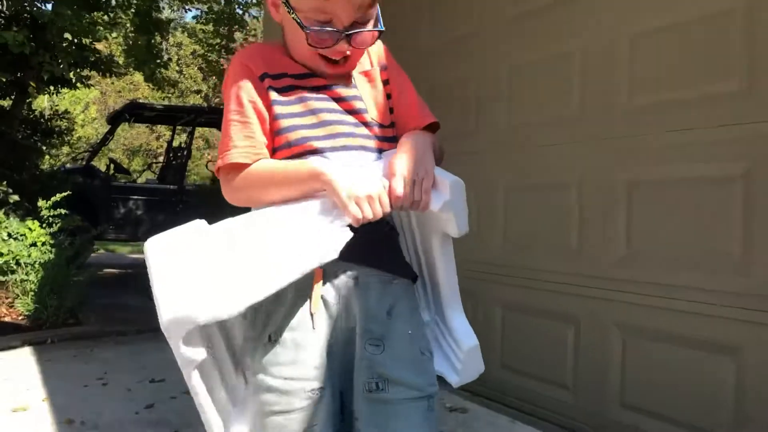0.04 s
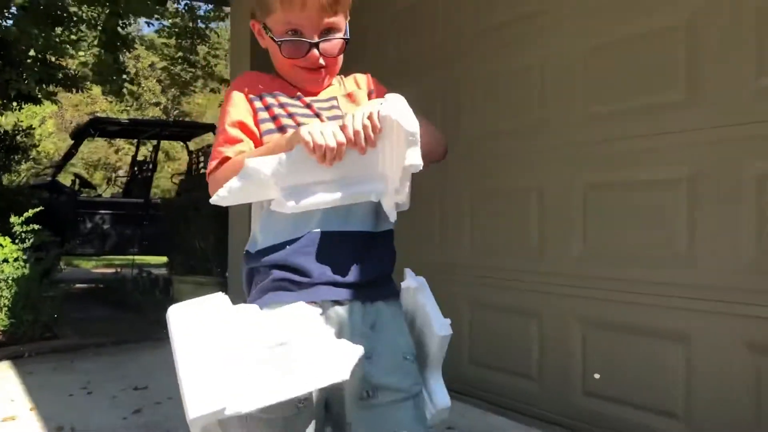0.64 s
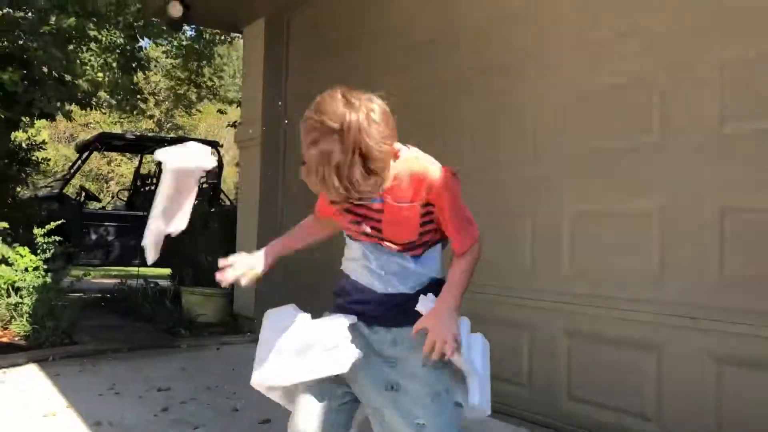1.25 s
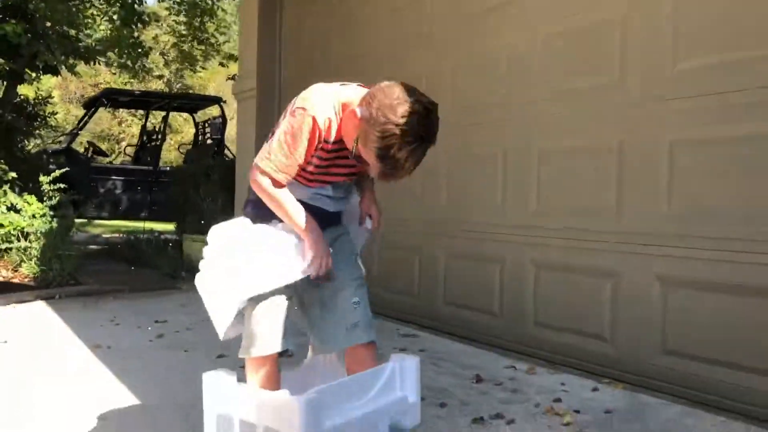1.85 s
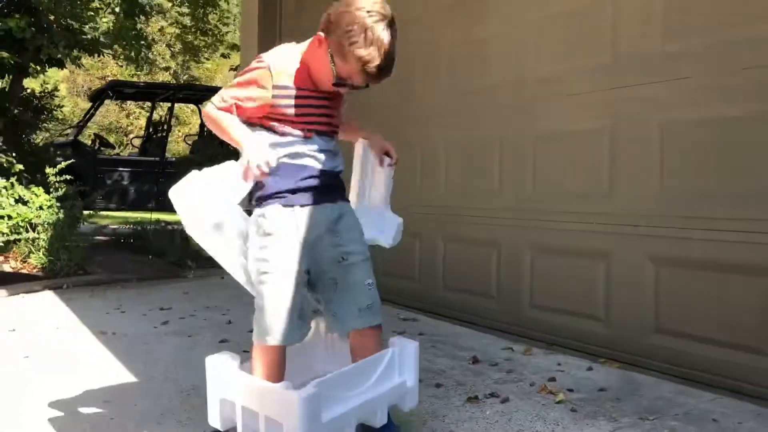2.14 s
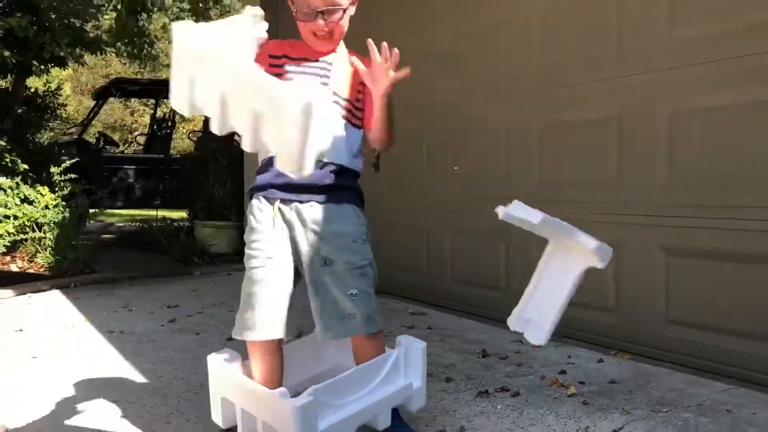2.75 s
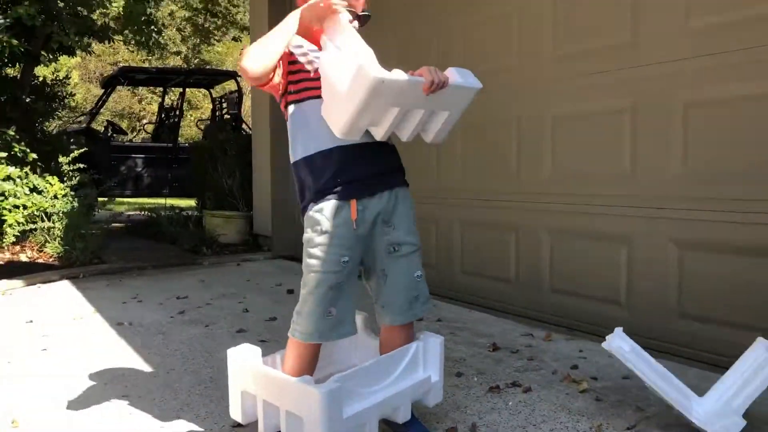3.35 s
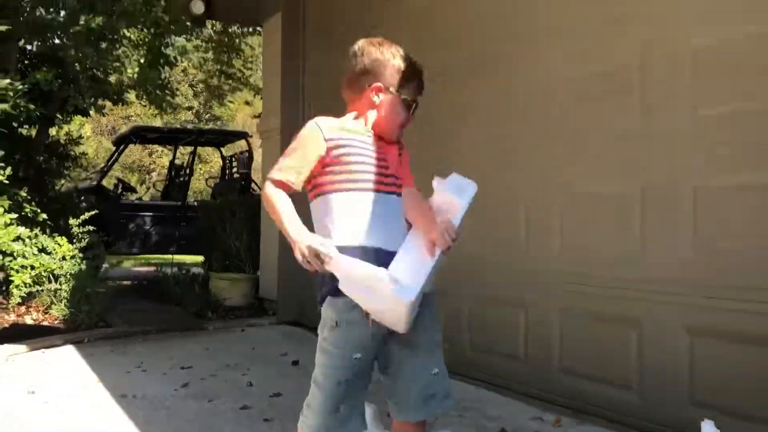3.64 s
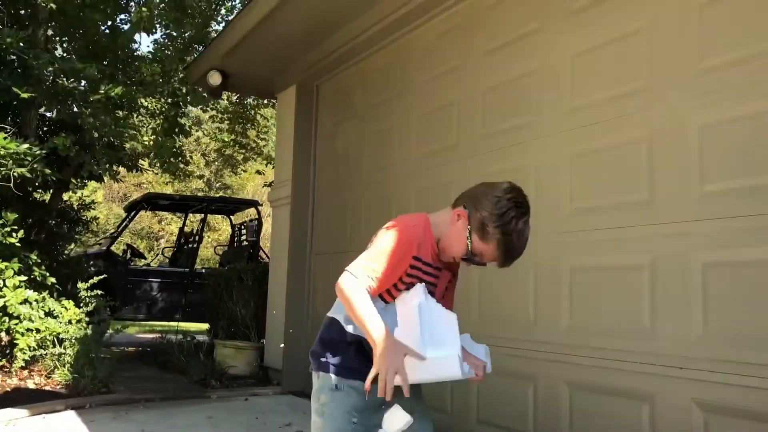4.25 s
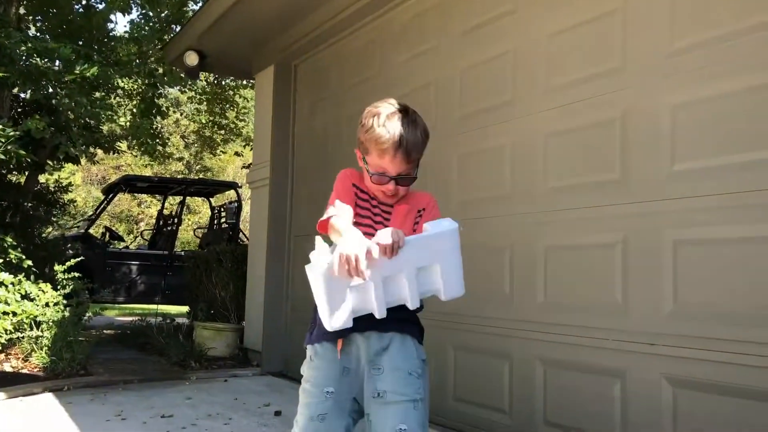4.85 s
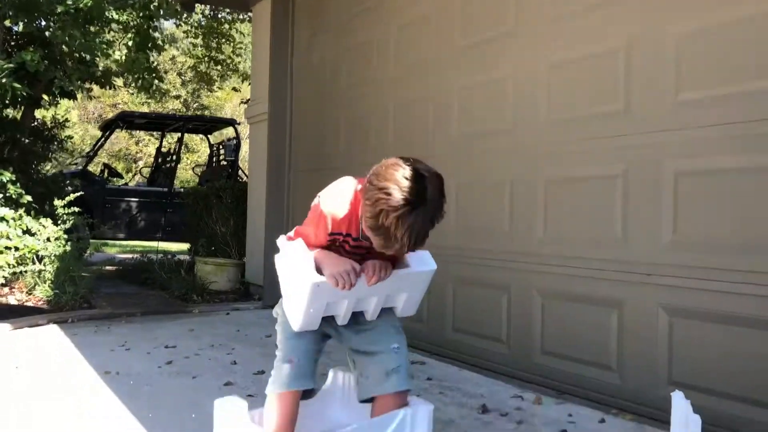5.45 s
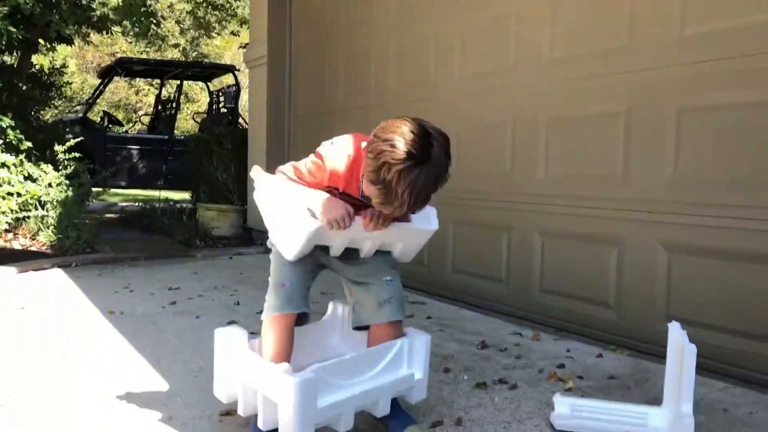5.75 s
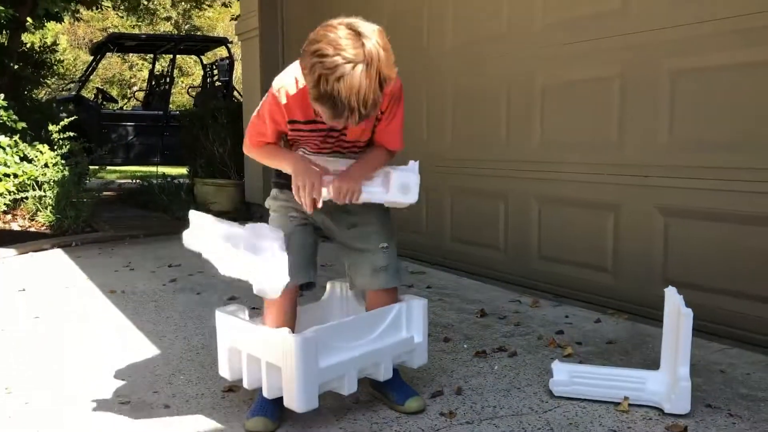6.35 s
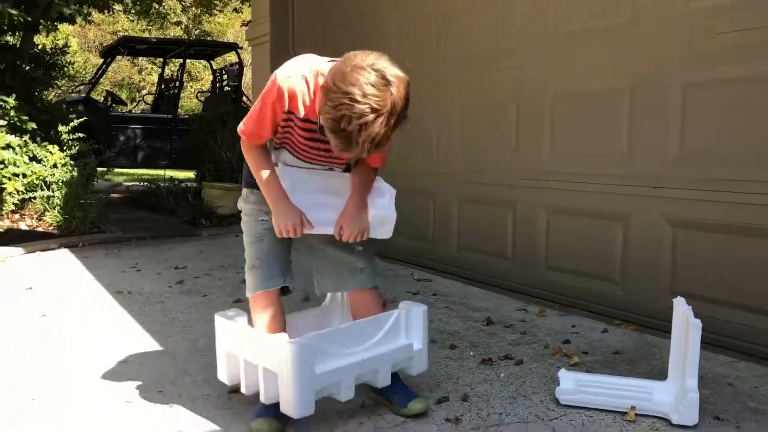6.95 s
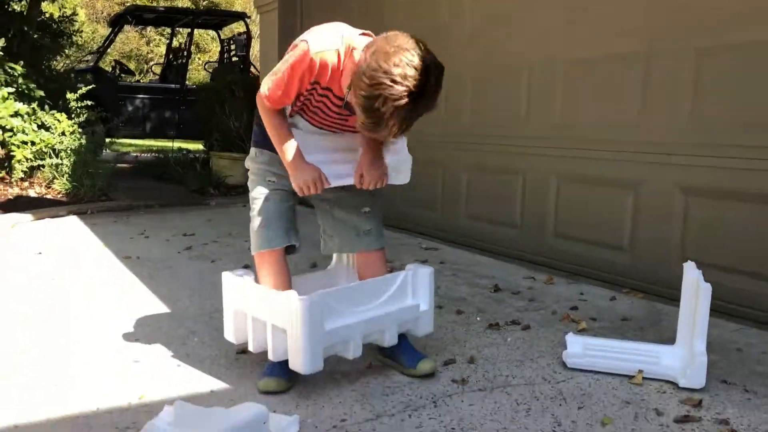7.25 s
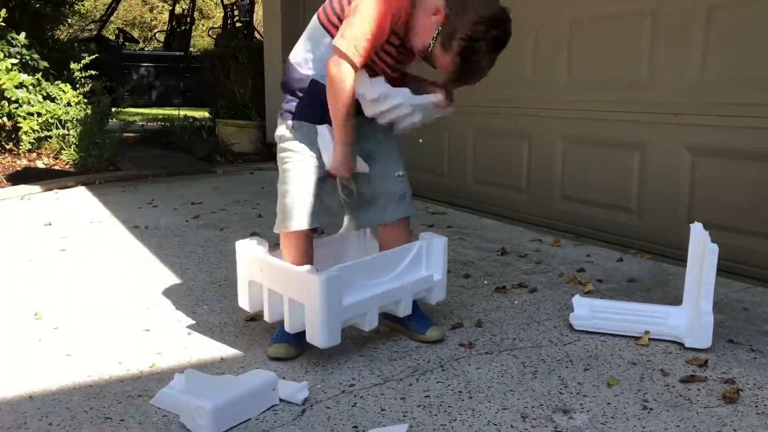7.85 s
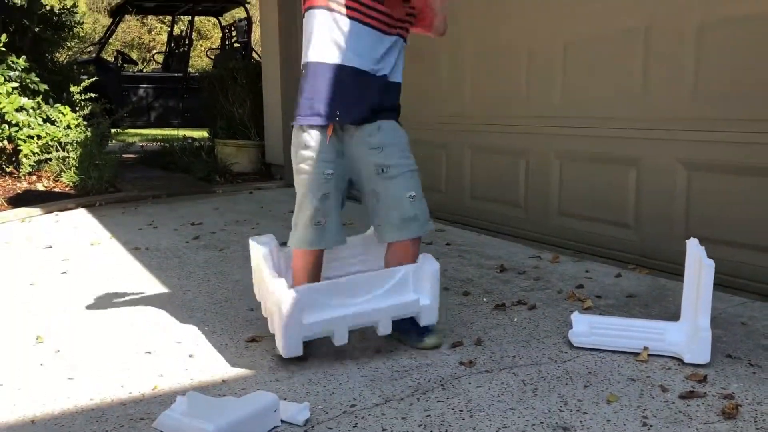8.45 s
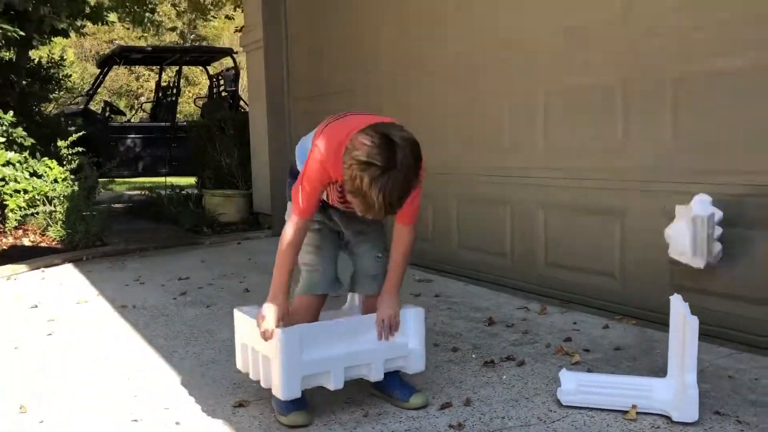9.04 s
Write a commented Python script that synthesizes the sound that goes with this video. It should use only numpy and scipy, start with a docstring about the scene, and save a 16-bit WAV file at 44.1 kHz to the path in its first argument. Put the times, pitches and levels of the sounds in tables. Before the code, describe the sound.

Outdoors by a garage door, nearby foam blocks snap five times, each break a short crackling burst with a hollow pop and a brief slap off the walls. In the gaps, handled pieces rustle softly, scuff and bump. One louder ringing knock comes shortly before the last snap, and a cluster of light, hollow thuds follows it. A low rumble and far machine drone continue underneath.

```python
"""A driveway, in front of a garage door: a child snaps styrofoam packing blocks by hand.
Each break is a run of bright cracks as the beads tear, and a hollow pop as the freed slab flexes.
Between breaks, pieces knock, drop and ring, and rub with a fine hiss, small ticks and squeaks.
The door and a far wall throw the cracks back, over a bed of outdoor air and far machine hum."""
import sys
import numpy as np
from scipy import signal
from scipy.fft import rfft, irfft
from scipy.io import wavfile
from scipy.ndimage import uniform_filter1d

SR = 44100
rng = np.random.default_rng(int(sys.argv[2]) if len(sys.argv) > 2 else 0)


def transcribe(u):
    """Save the signal u as a 16-bit wav file named by the first command-line argument.

    u: samples, shape (n,) or (channels, n), limited to [-1, 1]; the rate is SR.
    q: integer samples, one column per channel.
    """
    v = np.clip(np.atleast_2d(u).T, -1, 1)
    q = np.round(v * 32767).astype(np.int16)
    wavfile.write(sys.argv[1], SR, q)


N = 406161
TIME = np.arange(N) / SR
HIT_TIME = TIME[:8192]  # time axis of one short hit


# The hero snaps, one row a crack: start_s, crackle_db, tilt_db_per_octave, pop_db, pitch_hz
CRACK_CUES = [(.014, -7.5, 3, -20.5, 1440), (.0698, -9, 0.7, -18, 1230), (.0819, -24, -4, -18.5, 1070),
              (.0975, -35, 13, -13.5, 680), (.1054, -6, 1.5, -22, 1170), (.1225, -18, -4.5, -12.5, 404),
              (.1305, -6, 3.5, -13.5, 820), (.149, -16, 0, -15.5, 740), (.156, -17, 6, -18, 950),
              (1.9606, -25.5, -0.5, -20, 910), (1.9731, -15, -2, -29, 1370), (1.9845, -14, -0.5, -23, 1105),
              (2.1118, -22, -1, -37, 1110), (2.1342, -6.5, -1.5, -18, 1280), (2.138, -1, -1, -15.5, 940),
              (2.149, -18, 1, -17.5, 806), (2.162, -21, 1, -21, 950), (3.926, -5.5, 0.2, -20, 1480),
              (3.9302, -10, -1, -19, 1420), (3.9323, -37, -10, -9.5, 637), (5.7328, -7, -0.5, -13.5, 916),
              (5.7372, -9, 3, -36, 1120), (5.7582, -5.5, 0, -24, 1074), (5.769, -15, 1.5, -28, 1100),
              (7.6738, -17, -1.5, -26, 1000), (7.6805, -2.5, 0, -22, 1980), (7.6942, -10.5, 1, -17.5, 2000),
              (7.7076, -13, 5, -19.5, 1170)]

def cracks(tear_s=0.00097, tear_doubling_db=11, pop_lag_s=0.001237):
    """The beads tear first; the slower bending waves of the freed slab follow as a pop."""
    out = np.zeros(N)
    for start_s, crackle_db, tilt_db, pop_db, hz in CRACK_CUES:
        tearing_s = tear_s * 2 ** (-crackle_db / tear_doubling_db)  # a hard crack tears faster
        add(out, start_s, gain_of(crackle_db - 3) * crackle(tearing_s, tilt_db))
        body = flex(hz, swell(HIT_TIME / 0.003), slope_db=6.5, octaves=0.76, lowest_hz=312)
        punch = bending_wave(0.889 * hz, peak_s=0.0015, glide=0.73)
        pop = gain_of(-2) * body + gain_of(1) * punch
        add(out, start_s + pop_lag_s, gain_of(pop_db) * pop)
    return highpass(out, 230, order=3)  # front and back of a thin slab cancel in the bass


# Tone colour of tearing beads: frequency_hz, level_db
BEAD_EQ = [(150, 5.5), (350, -2), (700, 5.5), (1500, 3), (3000, 2.5), (5000, 1.5), (9000, -2.5),
           (16000, -7)]

def crackle(peak_s, tilt_db=3, clump_db=2, clump_hz=900):
    """Beads of uneven size part in a quick avalanche, which splinters into clumps."""
    n = len(HIT_TIME)
    clumps = shaped_noise(n, lambda f: -20 * np.log10(1 + (f / clump_hz) ** 2))
    snaps = rng.standard_normal(n) * gain_of(rng.standard_normal(n) + clump_db * clumps)
    snaps = equalise(snaps, lambda f: curve_at(BEAD_EQ, f) + tilt_db * np.log2(f / 6000))
    return burst(snaps, swell(HIT_TIME / peak_s))


def flex(hz, envelope, slope_db, octaves, lowest_hz):
    """Hollow body: the crowded, heavily damped bending modes of foam, gathered round one pitch."""
    def hump_db(f):
        bass_loss_db = 10 * np.log10(1 + (lowest_hz / f) ** 8)  # a small piece radiates no bass
        return -slope_db * (np.hypot(np.log2(f / hz), octaves) - octaves) - bass_loss_db
    return burst(shaped_noise(len(HIT_TIME), hump_db), envelope)


def bending_wave(hz, peak_s, glide):
    """High bending waves run fastest, so a pop of a few cycles falls in pitch."""
    turns = np.cumsum(hz * (1 + glide * np.exp(-HIT_TIME / peak_s))) / SR
    return swell(HIT_TIME / peak_s) * np.sin(2 * np.pi * turns)


# Knocks of loose pieces: start_s, thud_db, pitch_hz, scuff_db
KNOCK_CUES = [(1.19, -35.5, 304, -41), (1.299, -28.5, 923, -46), (1.519, -26, 1480, -52),
              (1.595, -23, 688, -31), (1.6055, -27, 515, -35), (2.464, -43, 2010, -57),
              (2.568, -40, 1510, -55), (2.877, -30.5, 807, -35.5), (2.902, -31.5, 572, -34.5),
              (3.012, -27.5, 452, -35), (3.115, -36, 1296, -48), (3.69, -30, 1870, -20.5),
              (4.712, -34.5, 588, -56), (4.868, -31.5, 707, -38), (4.985, -28.5, 1071, -35),
              (6.534, -28, 481, -45), (6.644, -32, 878, -42), (6.899, -33, 1190, -49),
              (6.918, -30.5, 1230, -37), (6.934, -24.5, 1563, -31.5), (8.899, -25.5, 513, -31.5),
              (8.984, -31.5, 740, -30.5), (9.003, -23.5, 514, -33), (9.071, -22, 888, -24),
              (9.193, -29.5, 670, -31)]

def knocks(attack_s=0.0002, decay_s=0.01, ring_t60_s=0.38, cushion_hz=2800):
    """Soft pieces hit hands, legs and concrete: a cushioned thud, a brief ring, a scuff of beads."""
    out = np.zeros(N)
    thud_envelope = (1 - np.exp(-HIT_TIME / attack_s)) * np.exp(-HIT_TIME / decay_s)
    ring_envelope = (1 - np.exp(-HIT_TIME / decay_s)) * gain_of(-60 * HIT_TIME / ring_t60_s)
    for start_s, thud_db, hz, scuff_db in KNOCK_CUES:
        thud = flex(hz, thud_envelope, slope_db=6.5, octaves=0.4, lowest_hz=189)
        thud += gain_of(-2) * bending_wave(hz, peak_s=0.0024, glide=0.34)
        thud = equalise(thud, lambda f: -10 * np.log10(1 + (f / cushion_hz) ** 4))
        # each grip leaves other modes free to ring
        free_hz = hz * 2 ** (np.linspace(-1, .5, num=5) + rng.uniform(-0.151, 0.17, size=5))
        ring = unit_rms(np.sin(2 * np.pi * np.outer(HIT_TIME, free_hz)).sum(axis=1)) * ring_envelope
        add(out, start_s, gain_of(thud_db) * (thud + gain_of(-15) * ring))
        add(out, start_s, gain_of(scuff_db) * crackle(peak_s=0.003))
    return out


# Thumps and rings of the torn slab, the hand-held block and the foam frame on the ground (the slab's ring at
# 0.19 s rises as the first breaks come back off the far wall): start_s, ring_db, thump_db, thump_pitch_hz,
# thump_peak_s
SLAB_HITS = [(.148, -38, -16, 820, 0.0044), (.188, -29.5, -32, 705, 0.0044),
             (1.872, -43, -17.5, 493, 0.0012), (2.903, -46, -31.5, 468, 0.02),
             (3.936, -36, -14.5, 452, 0.0041)]
BLOCK_HITS = [(6.934, -12, -1.5, 814, 0.0011), (7.129, -33, -17, 677, 0.00047)]
FRAME_HITS = [(0.001, -38, -28, 178, 0.0053), (1.193, -56, -33, 267, 0.0044),
              (1.307, -53, -21.5, 328, 0.0017), (1.596, -44.5, -25.5, 247, 0.0046),
              (2.880, -44, -21, 97, 0.0045), (3.013, -43, -19.5, 206, 0.0049),
              (3.165, -44, -28, 206, 0.0035), (6.447, -42, -27.5, 220, 0.0041),
              (6.534, -35.5, -21, 214, 0.011), (8.900, -39, -18, 215, 0.0067),
              (9.074, -26.5, -13, 113, 0.0066), (9.194, -27, -12.5, 340, 0.001)]
# The notes each piece rings with: pitch_hz, level_db, t60_s
SLAB_MODES = [(524, 10, 0.3), (750, 3, 0.2), (770, -6.5, 0.14), (890, 0, 0.24), (1045, 4.5, 0.27),
              (1470, -29, 0.31)]
BLOCK_MODES = [(584, -9, 0.33), (813, -3, 0.12), (900, -5, 0.23), (961, -3.5, 0.095), (1133, 4, 0.072),
               (1380, -0.5, 0.036), (1560, -9.5, 0.071), (1960, 3.5, 0.019)]
FRAME_MODES = [(151.6, 2.5, 0.31), (198.6, 8, 0.37), (259.5, 1.5, 0.45), (319.6, 6, 0.27), (430, 7, 0.065),
               (565, -7.5, 0.47)]

def ringing(hits, modes, attack_s=0.0018):
    """A hit gives a short thump and leaves the piece's own modes ringing."""
    t, out = TIME[:SR], np.zeros(N)
    for start_s, ring_db, thump_db, thump_hz, peak_s in hits:
        detune = np.clip(1 + 0.031 * rng.standard_normal(), .97, 1.03)  # each hold shifts the modes
        ring = sum(gain_of(db - 60 * t / t60_s) * np.sin(2 * np.pi * (hz * detune * t + rng.random()))
                   for hz, db, t60_s in modes)
        ring *= 1 - np.exp(-t / attack_s)
        thump = swell(t / peak_s) * np.sin(2 * np.pi * thump_hz * t)
        add(out, start_s, gain_of(ring_db) * ring + gain_of(thump_db) * thump)
    return out


# Booms of a slab coming fully apart: start_s, level_db, pitch_hz
BREAK_CUES = [(0.128, -18.5, 714), (.162, -20.5, 640), (2.136, -18.5, 730), (3.9327, -16, 650),
              (5.7368, -19, 570), (7.702, -25.5, 764)]

def wall_slaps(round_trip_s=0.078):
    """Slapback off the far wall: only a break's dull boom returns, smeared by the bushes."""
    out = np.zeros(N)
    for start_s, level_db, hz in BREAK_CUES:
        boom = bending_wave(hz, peak_s=0.00076, glide=0.29)
        smear = flex(hz, swell(HIT_TIME / 0.0062), slope_db=9.5, octaves=0.8, lowest_hz=350)
        add(out, start_s + round_trip_s, gain_of(level_db) * (boom + gain_of(-10) * smear))
    return out


# Slides of foam on foam or cloth: start_s, length_s, level_db
SLIDE_CUES = [(0.42, 0.29, -49.5), (0.752, 0.28, -49), (1.123, 0.24, -43.5), (1.41, 0.2, -46),
              (1.628, 0.67, -42.5), (2.84, 0.23, -43.5), (3.127, 0.21, -52.5), (3.422, 0.29, -38.5),
              (3.757, 0.16, -37), (4.167, 0.27, -43), (4.45, 0.27, -37), (4.74, 0.41, -45.5),
              (5.13, 0.3, -40), (5.946, 0.14, -38), (6.097, 0.18, -43), (6.334, 0.25, -42.5),
              (6.647, 0.13, -51), (7.07, 0.099, -44.5), (7.214, 0.32, -47.5), (7.67, 0.051, -41),
              (7.796, 0.086, -38.5), (7.89, 0.14, -46.5), (8.2, 0.17, -44.5), (8.452, 0.062, -38.5),
              (8.75, 0.92, -48.5)]

def hiss_level_db(attack_s=0.086, release_s=0.043, holding_db=-57, afterhiss_s=0.14, afterhiss_db=-37):
    """Fader ride for the hiss: each slide swells and dies over the rustle of hands holding foam."""
    t = TIME[:SR]
    power = np.full(N, gain_of(holding_db) ** 2)
    # a short swell of hiss follows each later break
    afterhiss = [(start_s, afterhiss_s, afterhiss_db) for start_s, _, _ in BREAK_CUES[2:]]
    for start_s, length_s, level_db in SLIDE_CUES + afterhiss:
        envelope = np.minimum(t / attack_s, 1) * np.exp(-np.maximum(t - length_s, 0) / release_s)
        add(power, start_s, (gain_of(level_db) * envelope) ** 2)
    return 10 * np.log10(power)


# Tone colour of sliding foam: frequency_hz, level_db
HISS_EQ = [(1200, -8.5), (2500, 0.5), (4400, 2), (7000, -1), (15500, -1.8)]

def rubbing(grain_db=3, judder_db=1.85, patch_db=2, body_hz=1000, firm_db=-44):
    """Countless tiny slips of beads hiss, brighter when pressed harder, and faintly stir the slab."""
    level_db = hiss_level_db() + judder_db * drift(17.4)
    slips = rng.standard_normal(N) * gain_of(grain_db * rng.standard_normal(N))
    hz, t, spectrum = signal.stft(slips, SR, nperseg=512)
    tilt_db_per_octave = 0.2 * (np.interp(t, TIME, level_db) - firm_db)
    brightness_db = np.outer(np.log2(np.maximum(hz, body_hz) / 8000), tilt_db_per_octave)
    # the contact patch keeps changing, and with it the colour
    patches = uniform_filter1d(rng.standard_normal(spectrum.shape), size=7, axis=0)
    patches = unit_rms(uniform_filter1d(patches, size=6, axis=1))
    colour_db = curve_at(HISS_EQ, hz)[:, None] + brightness_db + patch_db * patches
    hiss = unit_rms(signal.istft(spectrum * gain_of(colour_db), SR, nperseg=512)[1][:N])
    body = shaped_noise(N, lambda f: -5 * np.log2(f / body_hz) ** 2)
    return gain_of(level_db) * (hiss + gain_of(-12) * body)


# A few beads catch and let go: start_s, level_db
TICK_CUES = [(0.8041, -36), (0.881, -29), (3.165, -36), (3.298, -32.5), (7.053, -33), (8.1969, -38)]

def ticks(trim_db=-3, catches_per_s=18):
    """Dry crackles under the fingers; single beads also catch at random, louder during slides."""
    out = np.zeros(N)
    for start_s, level_db in TICK_CUES:
        add(out, start_s, gain_of(level_db + trim_db) * crackle(peak_s=0.0036))
    caught = rng.random(N) < catches_per_s / SR
    catches = caught * gain_of(hiss_level_db() + rng.uniform(0.84, 6, N))
    return out + signal.fftconvolve(catches, crackle(peak_s=0.00067))[:N]


# Scratchy squeaks: start_s, length_s, slip_rate_hz, resonance_hz, level_db
SQUEAK_CUES = [(.71, 0.083, 790, 4360, -47), (2.487, 0.036, 830, 1440, -43), (6.0, 0.1, 930, 4340, -46)]

def squeaks(jitter=0.025, roughness=0.89, slope_db=14):
    """Foam sticks and slips; the unsteady, uneven pulses scratch at one broad resonance."""
    out = np.zeros(N)
    wobble, strength = jitter * drift(490), 1 + roughness * drift(350)
    for start_s, length_s, slip_hz, resonance_hz, level_db in SQUEAK_CUES:
        span = slice(round(start_s * SR), round((start_s + length_s) * SR))
        turns = np.cumsum(slip_hz * (1 + wobble[span])) / SR
        slips = strength[span] * sum(np.cos(2 * np.pi * k * turns) for k in range(1, 10))
        tone = equalise(slips, lambda f: -slope_db * np.abs(np.log2(f / resonance_hz)))
        add(out, start_s, gain_of(level_db) * unit_rms(tone) * np.hanning(len(tone)))
    return out


# Early reflections off ground and door: delay_s, level_db
REFLECTIONS = [(0.012, -11.5), (0.016, -34)]
# Decay of the driveway's diffuse tail: frequency_hz, t60_s
TAIL_DECAY = [(150, 0.61), (700, 0.26), (2000, 0.26), (6000, 0.25), (16000, 0.27)]

def driveway(x, tail_db, build_s=0.0034, crossfade_s=4.49, tails=3):
    """Dull near reflections, then short diffuse tails that crossfade as the child moves."""
    response = signal.unit_impulse(SR // 2)
    dull_click = signal.lfilter([.25], [1, -.75], signal.unit_impulse(32))
    for delay_s, level_db in REFLECTIONS:
        add(response, delay_s, gain_of(level_db) * dull_click)
    out = signal.fftconvolve(x, response)[:N]
    for k in range(tails):
        hz, t, spectrum = signal.stft(rng.standard_normal(SR // 2), SR, nperseg=256)
        decay = gain_of(-60 * t / curve_at(TAIL_DECAY, hz)[:, None])
        tail = signal.istft(spectrum * decay, SR, nperseg=256)[1]
        tail *= 1 - np.exp(-(TIME[:len(tail)] / build_s) ** 2)
        send = np.sqrt(2 / tails) * np.cos(np.pi * (TIME / crossfade_s + k / tails))
        out += gain_of(tail_db) * signal.fftconvolve(x * send, tail / np.linalg.norm(tail))[:N]
    return out


# Tone colour of the open air: frequency_hz, level_db
AIR_EQ = [(20, -43), (40, -11), (60, 3), (95, -1), (160, -6), (260, -15.5), (450, -19.5), (1040, -17),
          (1700, -24), (3000, -45.5), (16000, -65)]

def outdoor_air(level_db=-40.4):
    """A steady bed of low rumble and airy wash."""
    return gain_of(level_db) * shaped_noise(N, lambda f: curve_at(AIR_EQ, f))


# Machine hum, one list of keyframes a tone: time_s, pitch_hz, level_db
HUM_KEYFRAMES = [
    [(0, 109.2, -54), (2.3, 108.1, -47), (4.3, 101, -43.5), (5.1, 100, -48.5), (5.7, 98.94, -40.5),
     (8.25, 98.64, -43), (8.8, 93, -51)],
    [(0, 142.1, -53), (2.1, 144.3, -45.5), (5.7, 138.2, -53), (7.6, 141, -56)],
    [(2.8, 162.5, -52), (3.9, 159.4, -48.5), (5.6, 159.7, -45.5), (8.15, 161.4, -49), (8.6, 140.6, -49)],
]

def machine_hum(waver_db=1.5, wander=0.004):
    """Far machines drone, each tone wavering in pitch and level on its own course."""
    out = np.zeros(N)
    for keyframes in HUM_KEYFRAMES:
        time_s, hz, db = np.transpose(keyframes)
        turns = np.cumsum(np.interp(TIME, time_s, hz) * (1 + wander * drift(6.4))) / SR
        tone = np.sqrt(2) * np.sin(2 * np.pi * (turns + rng.random()))
        out += tone * gain_of(np.interp(TIME, time_s, db) + waver_db * drift(4.9))
    return out


def gain_of(db):
    """Decibels to amplitude."""
    return 10 ** (np.asarray(db) / 20)


def unit_rms(x):
    """Scales to rms 1."""
    return x / np.sqrt(np.mean(x ** 2) + 1e-20)


def curve_at(points, hz):
    """Reads a curve on a log-frequency axis."""
    f, value = np.transpose(points)
    return np.interp(np.log(hz + 1), np.log(f + 1), value)


def add(mix, start_s, sound):
    """Drops a sound into the mix at its cue."""
    part = mix[round(start_s * SR):][:len(sound)]
    part += sound[:len(part)]


def equalise(x, db_at):
    """Filters x by a rule that gives dB for each frequency."""
    return irfft(rfft(x) * gain_of(db_at(np.fft.rfftfreq(len(x), 1 / SR) + 1)), len(x))


def highpass(x, hz, order):
    """Rolls off the low end."""
    return signal.sosfilt(signal.butter(order, hz, "high", fs=SR, output="sos"), x)


def shaped_noise(n, db_at):
    """Equalised noise of rms 1."""
    return unit_rms(equalise(rng.standard_normal(n), db_at))


def drift(rate_hz):
    """Smooth random modulation of rms 1."""
    return shaped_noise(N, lambda f: -10 * np.log10(1 + (f / rate_hz) ** 6))


def burst(x, envelope):
    """Puts x under an envelope, with the energy of that envelope."""
    shaped = x * envelope
    return shaped * np.linalg.norm(envelope) / (np.linalg.norm(shaped) + 1e-20)


def swell(u):
    """Rises to 1 at u = 1, then dies."""
    return u * np.exp(1 - u)


def scene():
    """The mono mix: breaks get the most reverb, knocks and rings less; hiss and squeaks stay dry."""
    rings = ringing(SLAB_HITS, SLAB_MODES) + ringing(BLOCK_HITS, BLOCK_MODES)
    rings += ringing(FRAME_HITS, FRAME_MODES)
    foam = driveway(cracks() + wall_slaps(), tail_db=-7)
    foam += driveway(knocks() + ticks(), tail_db=-8.5)
    foam += driveway(rings, tail_db=-10)
    return (foam + rubbing() + squeaks() + outdoor_air() + machine_hum())[None]


def record(dry, ceiling=0.79, top_hz=16300):
    """A small microphone rounds off the loudest peaks; the deepest bass and top treble are cut."""
    rounded = dry / (1 + (dry / ceiling) ** 6) ** (1 / 6)
    thinned = highpass(rounded, 42, order=4)
    lowpass = signal.firwin(511, top_hz, window=("kaiser", 9), fs=SR)
    return signal.oaconvolve(thinned, lowpass[None], "same")


dry = scene()
out = record(dry)
transcribe(out)
```